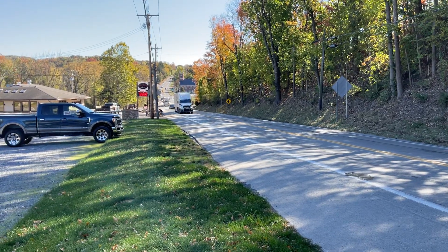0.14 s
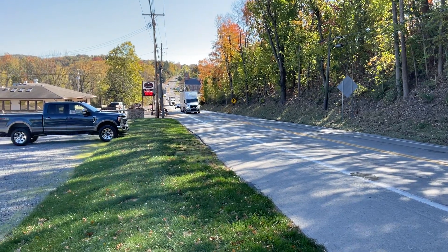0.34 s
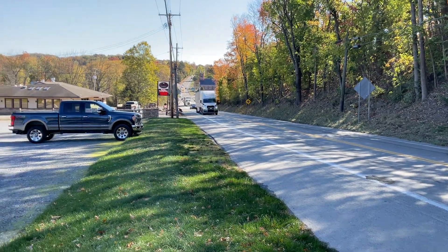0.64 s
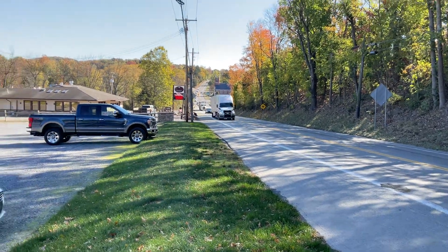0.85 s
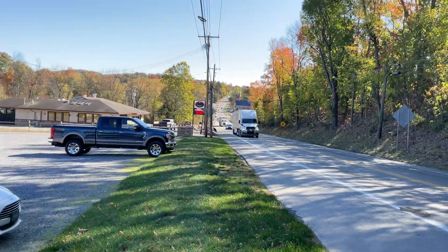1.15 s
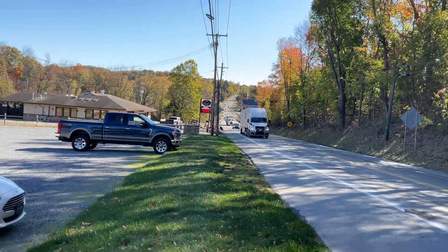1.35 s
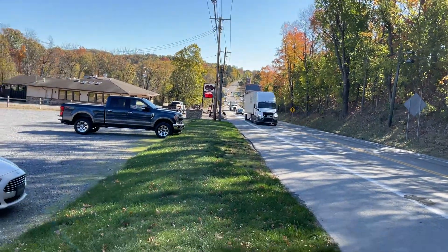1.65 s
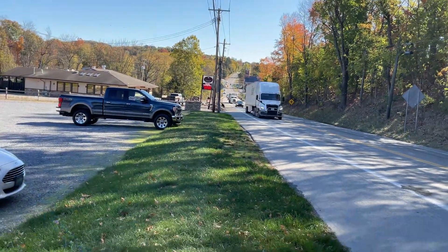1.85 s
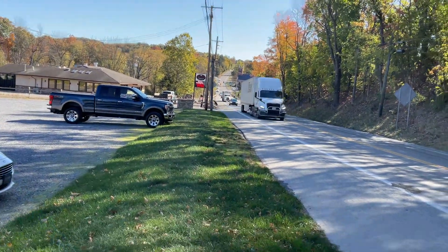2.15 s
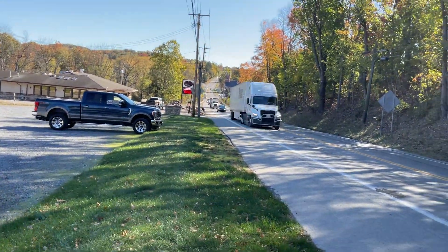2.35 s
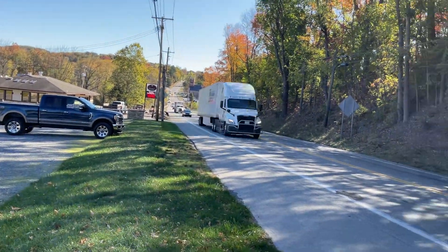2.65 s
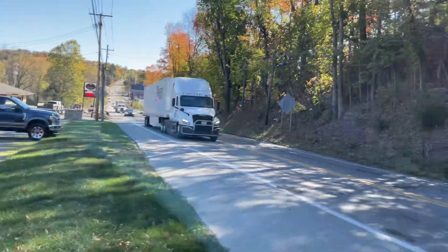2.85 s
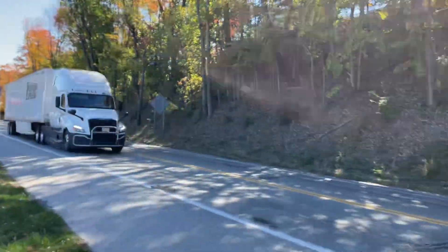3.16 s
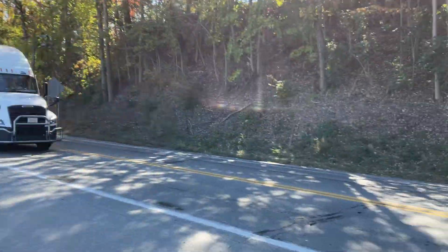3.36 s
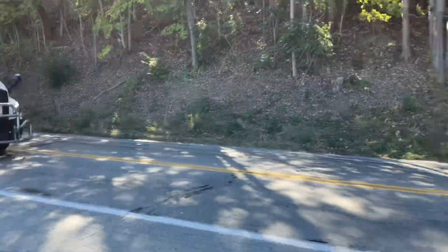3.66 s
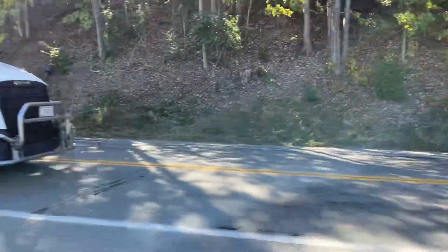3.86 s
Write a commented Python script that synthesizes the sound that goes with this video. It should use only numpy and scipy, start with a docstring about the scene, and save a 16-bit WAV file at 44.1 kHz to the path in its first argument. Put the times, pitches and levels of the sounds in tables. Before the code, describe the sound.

Truck air horn gives two short loud blasts as the truck's roar swells close on a road

```python
"""A truck's tyre roar and exhaust rumble come down a country road towards a phone held at the verge.
They swell and brighten as the engine slows and the turbo whistle falls; close by, the air horn gives two short
blasts that ring off the wooded bank. Roar is coloured noise in bands, engine and turbo are wavering sines, the
horn is a stack of partials with breath noise, and its echoes are copies at the same or a higher pitch with
scattered tails. Faint tones and puffs are bands of noise; knocks are short tones that swell and fade."""
import sys
import numpy as np
from scipy import signal
from scipy.fft import rfft, irfft
from scipy.io import wavfile

SR = 44100
rng = np.random.default_rng(int(sys.argv[2]) if len(sys.argv) > 2 else 0)


def int16_out(signal):
    """Quantize to a 16-bit WAV file."""
    q = np.round(np.clip(np.atleast_2d(signal).T, -1, 1) * 32767)
    wavfile.write(sys.argv[1], SR, q.astype(np.int16))


def to_linear_factor(level_db):
    """Convert decibel levels (scalar or array-like) to linear amplitude factors."""
    exponent = np.asarray(level_db, float) / 20
    return 10 ** exponent


N = 176400
PAD = N + 8192  # transform length, with room for the tails of the port filters
T = np.arange(N) / SR

# two horn blasts, each with rows of: t/s, pitch f/Hz, fundamental level/dB, level of the upper partials' buzz/dB
BLASTS = [
    [(3.255, 299.2, -40, -53), (3.267, 298.2, -20.5, -52), (3.277, 295.6, -14, -36),
     (3.29, 293.3, -10.5, -31), (3.33, 291.6, -11, -31), (3.36, 293.3, -11, -28),
     (3.395, 289.5, -12, -34.5), (3.415, 289, -19.5, -38), (3.44, 297, -27, -40), (3.47, 283, -40, -58)],
    [(3.672, 300, -37, -46), (3.679, 293.4, -24, -31.5), (3.684, 292, -15.5, -35.5),
     (3.7, 292.4, -14, -29.5), (3.73, 289.9, -15, -28), (3.756, 290.6, -13.5, -23.5),
     (3.814, 287.4, -15, -24), (3.84, 287.7, -17, -28.5), (3.865, 293.8, -18.5, -35), (3.89, 294, -24, -39),
     (3.91, 292, -24, -53)],
]


def in_time(rows):
    """Columns of a table as curves in time."""
    s, *cols = np.transpose(rows)
    return [np.interp(T, s, c) for c in cols]


def at_hz(points, hz):
    """Read a table on a log-frequency axis."""
    f, v = np.transpose(points)
    return np.interp(np.log(np.maximum(hz, 1)), np.log(f), v)


def drift(rate_hz, size=N):
    """Random wander of spread 1: noise through a two-pole lowpass, drawn every 40 samples."""
    r = np.exp(-80 * np.pi * rate_hz / SR)
    noise = rng.standard_normal(size // 40 + 2002)
    slow = signal.lfilter([1], [1, -2 * r, r * r], noise)[2000:]  # skips the filter's start
    to_unit_spread = np.sqrt((1 - r * r) ** 3 / (1 + r * r))
    return np.interp(np.arange(size) / 40, np.arange(len(slow)), slow * to_unit_spread)


def bump(start, length):
    """A smooth rise and fall."""
    return np.sin(np.pi * np.clip((T - start) / length, 0, 1)) ** 2


def band_noise(low_hz, high_hz):
    """Noise between two edges, rms 1."""
    band = signal.butter(2, [low_hz, high_hz], "band", fs=SR, output="sos")
    x = signal.sosfilt(band, rng.standard_normal(N))
    return x / x.std()


def ports(x, factor=0.91):
    """A sound from up the road reaches the phone's two ports with a level and phase difference."""
    # left minus right, before the factor: f/Hz, level/dB
    port_db = [(25, 4), (80, -1), (260, -2), (500, -2.5), (650, 0.5), (780, 7), (950, 9), (1100, 0.5),
               (1400, 5), (1750, -6.5), (2200, -0.5), (3000, -2), (4500, -1.5), (6000, -4.5), (7400, -1.5)]
    # lag of the left port: f/Hz, phase/rad
    port_rad = [(25, -3.3), (80, -0.06), (200, 0.38), (430, 0.83), (520, 1.64), (690, 2), (950, 1.85),
                (1150, 1.29), (1450, 1.0), (1800, 0.97), (2300, -2), (3000, -3), (3600, -5.5), (4300, -6.0),
                (6000, -6.0), (7400, -5.5)]
    hz = np.arange(PAD // 2 + 1) * SR / PAD
    half = to_linear_factor(factor * at_hz(port_db, hz) / 2) * np.exp(-.5j * at_hz(port_rad, hz))
    even = np.sqrt(2 / (abs(half) ** 2 + abs(half) ** -2))  # keeps the mean power of the two
    return irfft(rfft(x, PAD) * even * np.array([half, 1 / half]), PAD)[:, :N]


def roar():
    """Overlapping bands of coloured noise swell with nearness; returns the direct and the diffuse part."""
    # nearness of the truck, as its tyre hiss; only the swing about the mean counts: t/s, level/dB
    approach = [(0.0, -55.5), (1.29, -52.5), (3.05, -44), (3.48, -40), (3.7, -40.5), (3.85, -40),
                (4.0, -36.5)]
    # tyres, exhaust and wind at mid approach: f/Hz, level/dB per Hz
    spectrum = [(30, -79), (50, -57), (90, -50.5), (180, -54.5), (260, -57.5), (350, -62), (460, -66.5),
                (650, -56), (850, -57.5), (1200, -63), (1800, -65.5), (2500, -73), (4000, -79),
                (6000, -87.5), (8000, -94.5), (10000, -103), (12500, -115), (15500, -120)]
    # how far each range follows the approach; the treble rises most: f/Hz, share/dB per dB
    follows = [(60, 0.98), (250, 0.86), (800, 0.8), (1600, 0.76), (4500, 1.03), (9000, 1.71), (14000, 2.5)]
    # roar arriving from all round, re direct, at mid approach: f/Hz, level/dB
    all_round = [(30, -32), (100, -23), (300, -24), (500, -6.5), (750, -15.5), (1300, -2.5), (2000, -6),
                 (3000, -8.5), (6000, -25), (9000, -28)]
    # steady traffic further off, re the roar at mid approach: f/Hz, level/dB
    traffic = [(60, -7.5), (160, -4.5), (350, -6.5), (550, -16), (800, -24), (1600, -8), (4000, -8.5),
               (8000, -5.5), (14000, -26)]
    flicker_db, gust_db = 1.0, 0.5
    diffuse_shrinks = 0.27  # dB per dB of nearness

    near_db, = in_time(approach)
    near_db = near_db - near_db.mean()
    hz = np.arange(N // 2 + 1) * SR / N
    diffuse_gain = to_linear_factor(at_hz(all_round, hz))
    part_gains = np.array([hz > 0, diffuse_gain, diffuse_gain])
    colour = to_linear_factor(at_hz(spectrum, hz)) * np.sqrt(SR / 4) * part_gains
    noise = rfft(rng.standard_normal((3, N))) * colour
    gust = drift(9.0)
    out = 0
    for mid in 30 * 2 ** np.arange(0, 10, .75):
        octaves_off = np.log2(hz / mid + 1e-9)
        mask = np.cos(np.pi / 2 * np.clip(octaves_off / .75, -1, 1)) ** 2
        truck_gain = to_linear_factor(at_hz(follows, mid) * near_db)
        swell = np.hypot(truck_gain, to_linear_factor(at_hz(traffic, mid)))
        waver = to_linear_factor(gust_db * gust + flicker_db * drift(11.3))
        out = out + irfft(noise * mask, N) * swell * waver
    return out[0], out[1:] * to_linear_factor(-diffuse_shrinks * near_db)


def engine():
    """Low orders of the firing rate, each a sine wavering in level on one shared, slightly unsteady turn."""
    # engine, before a lift of 0.5 dB: t/s, firing f/Hz, level/dB
    firing = [(0, 87.7, -49), (.09, 86.98, -30.5), (.9, 87, -36), (1.5, 85.96, -34), (2.1, 84, -38.5),
              (2.9, 82.83, -39.5), (3.3, 81.28, -30.5), (4, 81.13, -26)]
    # orders: multiple of the firing rate, level/dB
    orders = [(.67, -12.5), (1.0, 0), (1.33, -6), (2.0, -11.5), (2.67, -12.5)]
    waver_db = 2.0
    hz, db = in_time(firing)
    turn = 2 * np.pi * np.cumsum(hz * (1 + .01 * drift(4.14))) / SR
    out = np.zeros(N)
    for k, order_db in orders:
        gain = to_linear_factor(db + 0.5 + order_db + waver_db * drift(6.5))
        out += gain * np.sin(k * turn + rng.uniform(0, 2 * np.pi))
    return out


def turbo():
    """The spinning turbo's falling whistle and its octave, each wavering in level."""
    # whistle: t/s, f/Hz, level of the first tone/dB, level of the octave/dB
    whistle = [(.4, 9950, -88, -115), (1.0, 8950, -80, -110), (1.5, 8100, -78, -100), (1.8, 7650, -84, -88),
               (2.1, 7330, -88, -80), (2.35, 7030, -88, -80), (2.7, 6650, -88, -78), (3.1, 6350, -86, -73),
               (3.4, 6100, -80, -67), (4, 6000, -78, -66)]
    hz, first_db, octave_db = in_time(whistle)
    spin = 2 * np.pi * np.cumsum(hz * (1 + .002 * drift(120))) / SR
    first = to_linear_factor(first_db + 3 * drift(15)) * np.sin(spin)
    octave = to_linear_factor(octave_db + 3 * drift(15)) * np.sin(2 * spin)
    return first + octave


def horn():
    """A reed pulses once a cycle: low partials in step, swelling and fading; wavering high ones; gated breath."""
    # per blast, low partials, each swelling and fading at its own rate:
    # multiple, level/dB re fundamental, depth of fading, rate f/Hz, weakest at t/s
    low_partials = [
        [(2, -12.5, 0.43, 2.8, 3.38), (3, -4.5, 0.12, 6.4, 3.3), (4, -15, 0.76, 8.1, 3.39),
         (5, -16, 0.33, 6.6, 3.33), (6, -14.5, .3, 10, 5.3), (7, -26, 0.48, 9.7, 3.31), (8, -25, 0.37, 8, 3.35)],
        [(2, -18.5, 0.57, 4, 3.72), (3, -2.5, 1, 4.7, 3.785), (4, -17.5, .6, 4, 3.715),
         (5, -14.5, 0.73, 5, 3.71), (6, -16.5, .4, 8.6, 3.81), (7, -15, 0.8, 9.2, 3.81),
         (8, -14.5, 1, 5.3, 3.71)],
    ]
    # upper partials re buzz: f/Hz, level/dB
    bell = [(2600, -4), (2900, -13.5), (3400, -10), (4300, -13.5), (5000, -10), (5600, -10), (6300, -9.5),
            (6800, -14.5), (7600, -37), (8800, -15), (9600, -20), (11500, -38), (12800, -31),
            (14500, -32.5)]
    waver_db, waver_hz, breath_db = 2.8, 22, -14  # breath is re buzz
    out = np.zeros(N)
    for rows, partials in zip(BLASTS, low_partials):
        i = slice(int(rows[0][0] * SR), int(rows[-1][0] * SR))
        t = T[i]
        hz, db, buzz_db = (c[i] for c in in_time(rows))
        turn = 2 * np.pi * np.cumsum(hz) / SR
        tone = np.sin(turn)
        for k, k_db, depth, rate, s in partials:
            fading = 1 - depth * np.exp(2j * np.pi * rate * (t - s))
            tone = tone + to_linear_factor(k_db) * np.imag(np.exp(1j * k * turn) * fading)
        buzz = 0
        for k in range(9, 54):
            gain = to_linear_factor(at_hz(bell, k * hz.mean()) + waver_db * drift(waver_hz, size=len(t)))
            phase = rng.uniform(0, 2 * np.pi) + 0.023 * k * drift(25, size=len(t))
            buzz = buzz + gain * np.sin(k * turn + phase)
        breath = to_linear_factor(breath_db) * band_noise(3500, 8300)[i] * (1 + 0.52 * np.cos(turn))
        edge = np.clip(np.minimum(t - t[0], t[-1] - t) / .003, 0, 1)  # 3 ms ramps
        out[i] = edge * np.sqrt(2) * (to_linear_factor(db) * tone + to_linear_factor(buzz_db) * (buzz + breath))
    return out


def bank_echo(x):
    """Each blast read at its echo's pitch ratio, dulled, and scattered by trees and bank into dying tails."""
    # returns of the horn, at the same or a higher pitch: pitch ratio, delay/s, level/dB, t60/s
    echoes = [(1.0, .02, -15.5, 0.35), (1.044, .16, -16.5, 0.032), (1.045, .08, -15, 0.77),
              (1.08, .14, -20.5, .8)]
    out, t = 0, T[:SR]
    dull = signal.sosfilt(signal.butter(1, 1800, fs=SR, output="sos"), x)  # lowpass, Hz
    for ratio, delay, db, t60 in echoes:
        copy = np.zeros(N)
        for rows in BLASTS:
            start, end = rows[0][0], rows[-1][0]
            blast = dull * (T >= start) * (T < end)
            copy += np.interp(start + (T - start - delay) * ratio, T, blast)
        tail = rng.standard_normal((3, SR)) * to_linear_factor(-60 * t / t60)
        tail /= np.sqrt((tail ** 2).sum(axis=1, keepdims=True))
        scattered = signal.fftconvolve(copy[None], tail, axes=1)[:, :N]
        out = out + to_linear_factor(db + 1.0 * drift(8.0)) * scattered
    return ports(out[0]) + 0.39 * out[1:]  # one part from up the road, two from all round


def faint_tones():
    """Whines of the road, a steady high line and the horn's overtones ringing on, as narrow fluttering noise."""
    # faint narrow tones: start t/s, length/s, f/Hz, width/Hz, level/dB
    narrow_tones = [(.8, .85, 1190, 80, -38), (0, .9, 1600, 90, -46), (1.9, .4, 1170, 70, -42),
                    (2.7, 1.3, 1400, 150, -38), (3.4, .3, 940, 30, -32), (3.86, .3, 945, 30, -27),
                    (3.35, .4, 640, 40, -35), (-.3, 2.4, 7550, 100, -75)]
    flutter_db = 3
    out = np.zeros(N)
    for s, length, hz, width, db in narrow_tones:
        gain = to_linear_factor(db + flutter_db * drift(25)) * np.sqrt(bump(s, length))
        out += gain * band_noise(hz - width / 2, hz + width / 2)
    return out


def seam_puffs():
    """Brief puffs of treble noise as the wheels cross seams."""
    # puffs: middle t/s, length/s, level/dB
    puffs = [(1.58, .08, -73.5), (2.07, .06, -68), (2.29, .05, -63), (2.74, .08, -75.5),
             (3.061, 0.022, -53)]
    gain = sum(to_linear_factor(db) * bump(s - length / 2, length) for s, length, db in puffs)
    return band_noise(7000, 11000) * gain


def knocks():
    """Hollow knocks, and low thumps as axles cross bumps: tones under a short bell-shaped swell."""
    # knocks: middle t/s, f/Hz, level/dB, length from the middle to 1/e/s
    hits = [(.23, 774, -33, .011), (.368, 760, -29.5, 0.0091), (2.093, 140, -24, .006),
            (2.97, 226, -22.5, 0.022), (3.644, 130, -16.5, 0.0066), (3.912, 171, -12.5, 0.0064),
            (3.96, 111, -16, .012), (3.99, 100, -16, 0.0079)]
    out = np.zeros(N)
    for s, hz, db, length in hits:
        swell = np.exp(-((T - s) / length) ** 2)
        out += to_linear_factor(db) * swell * np.cos(2 * np.pi * hz * (T - s))
    return out


def scene():
    """Truck, horn, echo and small sounds at the two ports of the phone on the verge."""
    direct, diffuse = roar()
    blasts = horn()
    up_the_road = direct + engine() + turbo() + faint_tones() + seam_puffs() + knocks()
    return ports(up_the_road) + diffuse + ports(blasts, 1.8) + bank_echo(blasts)


def band_limit(x):
    """A steep low-pass at the top of the band."""
    return signal.sosfilt(signal.butter(12, 15880, fs=SR, output="sos"), x)


def record(dry):
    """The phone keeps the top of the band in mono."""
    mono_above_hz = 7600
    mid = dry.mean(axis=0)
    side = rfft(dry[0] - dry[1], PAD) / 2
    hz = np.arange(PAD // 2 + 1) * SR / PAD
    side = irfft(side * (hz < mono_above_hz), PAD)[:N]
    return band_limit(np.array([mid + side, mid - side]))


dry = scene()
out = record(dry)
int16_out(out)
```